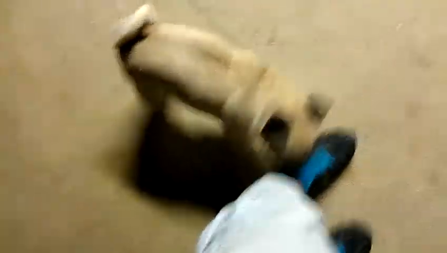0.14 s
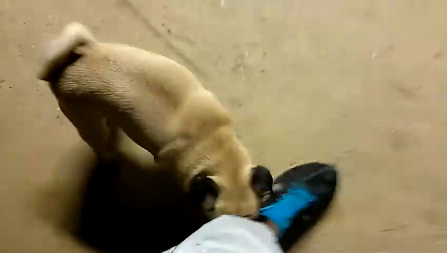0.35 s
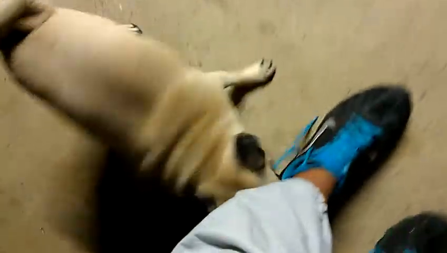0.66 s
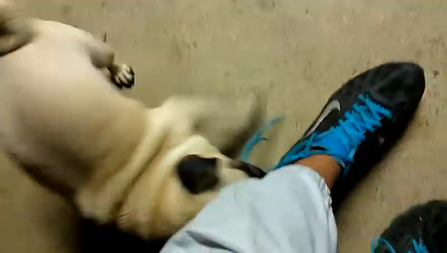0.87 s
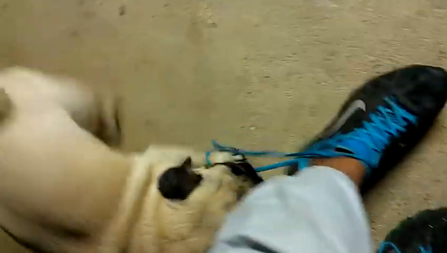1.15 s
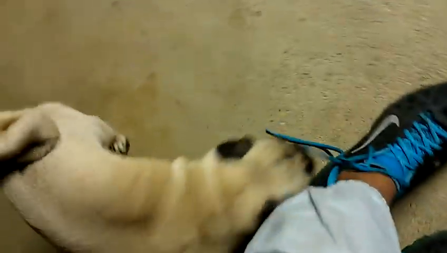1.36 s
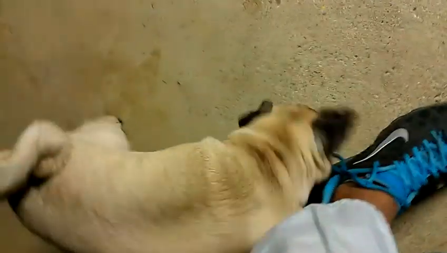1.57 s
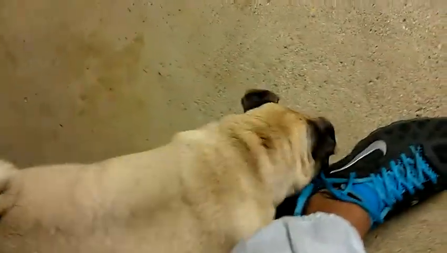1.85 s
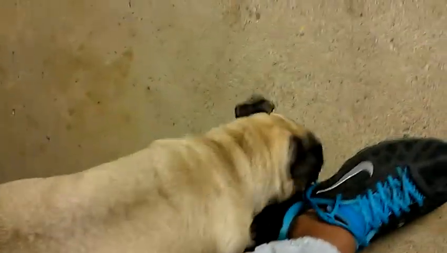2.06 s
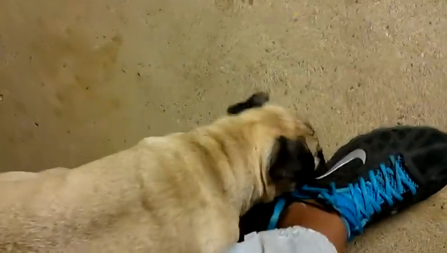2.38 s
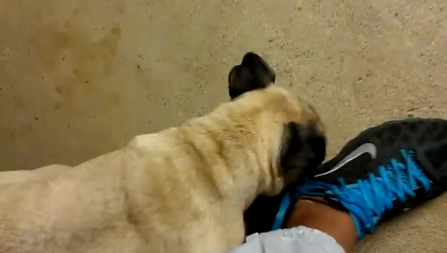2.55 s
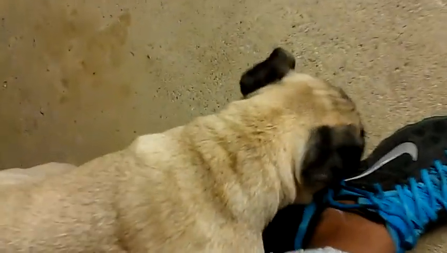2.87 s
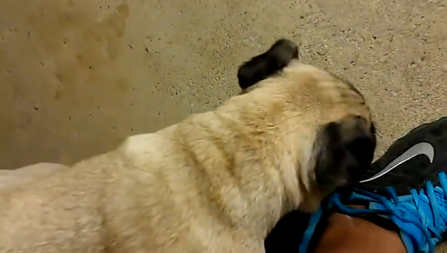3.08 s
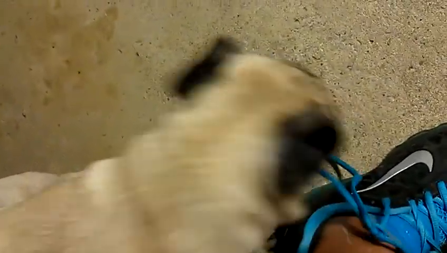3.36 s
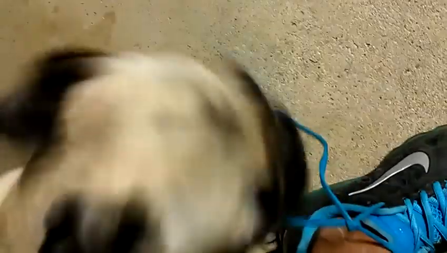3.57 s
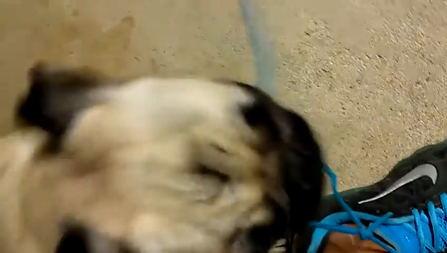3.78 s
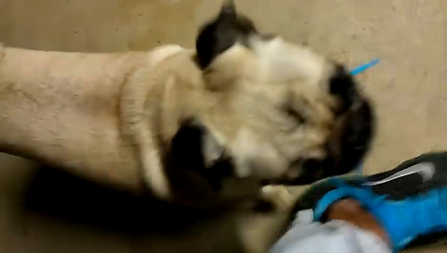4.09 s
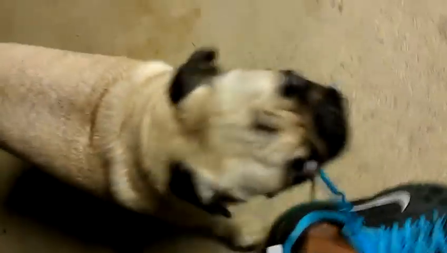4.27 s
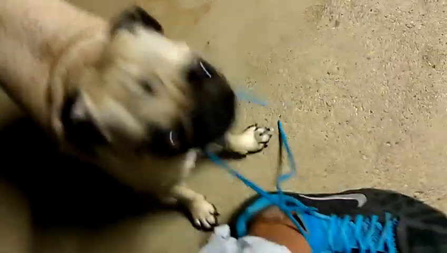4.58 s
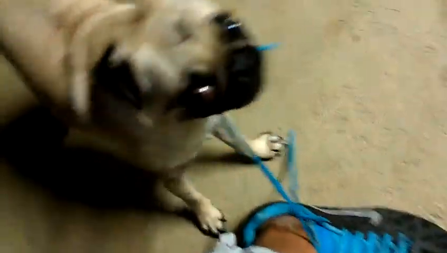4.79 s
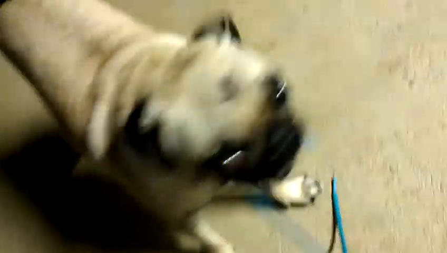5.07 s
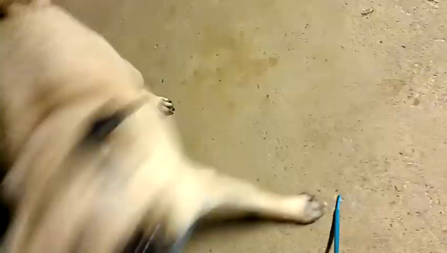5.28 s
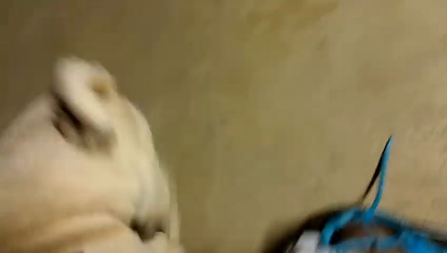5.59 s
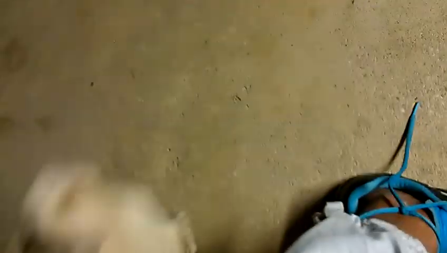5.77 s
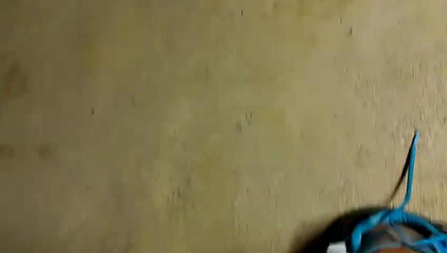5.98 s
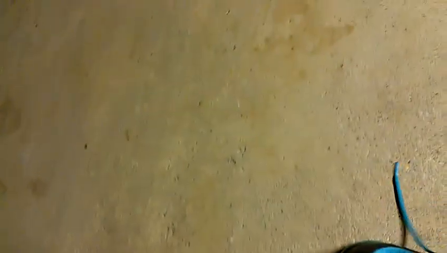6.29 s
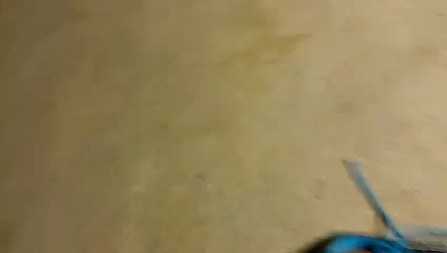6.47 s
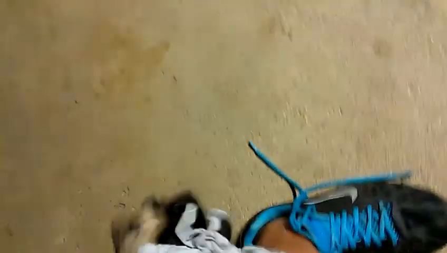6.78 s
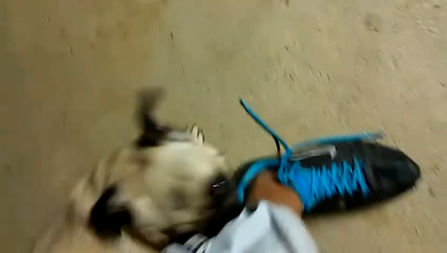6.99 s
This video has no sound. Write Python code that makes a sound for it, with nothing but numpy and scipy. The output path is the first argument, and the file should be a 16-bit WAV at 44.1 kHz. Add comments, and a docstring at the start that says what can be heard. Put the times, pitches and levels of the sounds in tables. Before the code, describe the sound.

A small flat-faced dog snorts and rasps close up, with wet throaty pops and claw clicks on concrete in a hard room.

```python
"""A small flat-faced dog snorts and rasps as it tugs at a shoelace on concrete, close under a phone.
Air noise rushes through throat, mouth, cheek and nostril resonances; the palate flutters and pops as short rings.
Claws and teeth click as bursts of noise. Nearby surfaces and the hard room answer with decaying noise echoes.
Far off lie steady room noise and two wavering machine tones; the phone's stereo microphone colours the dog and room."""
import sys
import numpy as np
from scipy import signal
from scipy.fft import rfft, irfft, next_fast_len
from scipy.io import wavfile
from scipy.ndimage import uniform_filter1d, map_coordinates

SR = 44100
rng = np.random.default_rng(int(sys.argv[2]) if len(sys.argv) > 2 else 0)


def materialize(psi):
    """Save the field psi as 16-bit PCM at rate SR to the path in sys.argv[1].

    A 1-D psi becomes a single channel; in a 2-D psi each row is a channel.
    """
    bounded = np.clip(np.atleast_2d(psi).T, -1, 1)
    quanta = np.round(bounded * 32767).astype(np.int16)
    wavfile.write(sys.argv[1], SR, quanta)


N = 314874
THROAT_HZ = 781


def amp(db):
    """Gain of a level in dB."""
    return 10 ** (np.asarray(db) / 20)


def unit(x):
    """x at rms 1."""
    return x / np.sqrt(np.mean(np.abs(x) ** 2) + 1e-20)


def along(points, hz):
    """(Hz, value) points read on a log frequency axis."""
    f, value = np.transpose(points)
    return np.interp(np.log(hz + 1), np.log(f + 1), value)


def wobble(rate):
    """A smooth random curve with rate knots a second."""
    knots = rng.standard_normal(int(N * rate / SR) + 4)
    return map_coordinates(knots, [np.arange(N) * rate / SR])


def filtered(x, response):
    """x times a response of frequency."""
    m = next_fast_len(N + SR // 2)
    return irfft(rfft(x, m) * response(np.fft.rfftfreq(m, 1 / SR)), m)[..., :N]


def resonance(hz, centre_hz, width_hz, db):
    """A steep peak over frequency, scaled to unit power and then to its level."""
    shape = 1 / (1 + ((hz - centre_hz) / width_hz) ** 2)
    return amp(db) * shape / np.sqrt(np.mean(shape ** 2, axis=0))


# How alike diffuse sound is at the two microphone ports.
# Each row: frequency in Hz, left-right likeness (1 is identical).
PORT_LIKENESS = [(60, 0.48), (180, 1), (520, 0.82), (1540, 0.55), (4560, 0.27), (13500, 0.19)]


def spread(pair):
    """Two unrelated signals mixed into left and right as alike as the ports hear them."""
    def mid_and_side(hz):
        turn = np.arccos(np.clip(along(PORT_LIKENESS, hz), -1, 1)) / 2
        return np.array([np.cos(turn), np.sin(turn)])

    mid, side = filtered(pair, mid_and_side)
    return np.array([mid + side, mid - side])


# Puffs and rasps of air from the dog, close under the microphone.
# Each row: top reached in seconds, rise in seconds, hold in seconds, fall in seconds, throat level in dB,
# mouth level in dB, mouth pitch in Hz, cheek level in dB, cheek pitch in Hz, nostril level in dB,
# damping from 0 to 1 (limited below to 0.06-0.6).
PUFFS = [(0.0, .01, .005, 0.21, -41, -43, 1630, -41, 3980, -43.5, .3),
         (0.26, 0.24, .005, 0.045, -43, -43, 1720, -43, 3970, -42, .3),
         (0.309, .04, 0.017, 0.078, -37, -34, 1910, -37.5, 3510, -36, 0.2),
         (0.392, 0.06, 0.0089, 0.11, -33, -17.5, 1950, -23, 3800, -31.5, 0.27),
         (0.438, .08, 0.071, 0.037, -36.5, -23.5, 1850, -31, 4200, -28.5, 0.19),
         (0.544, 0.023, 0.035, 0.18, -42, -21.5, 1970, -29.5, 4080, -36, 0.05),
         (.62, 0.14, .08, 0.06, -26.5, -35, 1750, -38, 4240, -43, .2),
         (0.757, 0.13, 0.0093, 0.054, -23.5, -22.5, 1440, -30.5, 3850, -35, 0.27),
         (0.812, 0.051, .005, 0.14, -31.5, -31.5, 1720, -31, 4300, -29.5, 0.7),
         (0.996, 0.018, 0.0044, 0.05, -33.5, -32.5, 1460, -51, 3900, -43, 0.32),
         (1.104, 0.094, .005, .1, -47, -55, 1610, -42, 3880, -39, .3),
         (1.156, 0.025, .015, .03, -46, -20, 1890, -37, 3670, -37, 0.22),
         (1.177, 0.032, .005, 0.18, -27, -19, 1910, -20.5, 3600, -28.5, 0.26),
         (1.227, 0.12, 0.054, 0.052, -30.5, -23.5, 1540, -35, 3620, -32, 0.28),
         (1.321, .015, 0.004, .1, -42, -18, 1990, -37, 3240, -56, 0.37),
         (1.434, .015, .02, .02, -43, -37, 1480, -43, 3700, -64, 0.2),
         (1.472, 0.017, 0.014, 0.14, -35, -31.5, 1595, -42, 3820, -77, 0.36),
         (1.63, 0.052, 0.0077, 0.015, -38, -38, 1920, -49, 3920, -74, 0.04),
         (1.903, 0.042, .006, 0.033, -31, -17.5, 2030, -41, 3550, -42, 0.2),
         (1.917, 0.023, .005, 0.2, -26.5, -33, 1780, -39, 3860, -40, 0.4),
         (2.097, 0.24, .06, .1, -48, -46, 1750, -44.5, 3820, -51, .3),
         (2.436, 0.066, 0.11, .1, -42.5, -38, 1960, -36.5, 4500, -39.5, 0.21),
         (2.564, 0.067, 0.063, .05, -50, -26, 2430, -33.5, 3700, -38.5, 0.17),
         (2.618, 0.066, .045, .06, -41, -27.5, 1360, -31.5, 4300, -38.5, 0.25),
         (2.7, 0.069, .04, .1, -34.5, -31, 1970, -31, 3870, -34.5, 0.35),
         (2.792, 0.12, 0.034, 0.062, -31.5, -23, 1750, -26.5, 4320, -33.5, 0.45),
         (2.908, 0.022, .005, 0.38, -37.5, -39.5, 1700, -39, 3840, -40.5, 0.7),
         (3.028, 0.33, .005, .2, -59, -38.5, 1430, -39.5, 3640, -65, 0.3),
         (3.254, 0.25, .03, 0.15, -40, -36.5, 1900, -36.5, 3750, -42.5, 0.86),
         (3.449, 0.013, 0.028, 0.23, -34, -31.5, 1600, -36, 3980, -42.5, 0.45),
         (3.55, 0.071, .005, 0.026, -49, -33, 1900, -29, 4970, -35, 0.23),
         (3.588, 0.047, .005, 0.043, -34, -31, 1780, -33.5, 4170, -51, 0.33),
         (3.633, 0.066, 0.067, 0.21, -35, -28.5, 2130, -26, 4940, -36, 0.25),
         (3.779, 0.13, .1, 0.15, -32, -29, 1580, -32, 4200, -33.5, .45),
         (3.934, 0.23, .005, .1, -37, -33, 1930, -36.5, 4690, -55, 0.21),
         (4.078, 0.055, .005, .05, -41, -38, 1560, -41, 3990, -50, 0.36),
         (4.15, .03, 0.067, .15, -53, -46.5, 1900, -49, 3800, -52, 0.2),
         (4.424, 0.015, .005, 0.097, -27, -28.5, 1430, -33, 3580, -42, 0.6),
         (4.492, 0.019, .005, 0.16, -33, -26, 1800, -31, 3850, -31.5, 0.65),
         (4.606, 0.052, .005, 0.034, -47, -37, 2150, -32, 3950, -23.5, 0.12),
         (4.687, 0.099, .005, 0.013, -38, -28.5, 1820, -34, 3670, -38, 0.33),
         (4.806, 0.091, .005, 0.04, -37, -33.5, 2290, -29, 3900, -21.5, 0.27),
         (4.893, 0.17, .005, 0.097, -39, -37, 1560, -41, 3440, -38.5, .26),
         (4.98, 0.043, 0.0054, 0.069, -34.5, -24.5, 1670, -30.5, 4960, -26.5, 0.3),
         (5.001, 0.056, 0.047, 0.074, -37, -31, 1860, -28.5, 5500, -32.5, .35),
         (5.073, 0.072, 0.022, .12, -29.5, -19, 1940, -27.5, 4020, -28, 0.27),
         (5.15, 0.1, .02, 0.11, -32, -30, 1740, -30.5, 4040, -46, 0.75),
         (5.27, 0.16, .005, 0.42, -41, -38.5, 1566, -41, 3980, -37.5, 0.27),
         (5.433, 0.016, .005, 0.092, -28, -29.5, 1340, -47, 3770, -57, 0.74),
         (5.464, 0.022, .005, .06, -35, -45, 1380, -38, 3970, -32, .55),
         (5.525, 0.071, .005, 0.049, -49, -42, 1880, -37.5, 3880, -29.5, 0.25),
         (5.592, 0.042, .04, 0.16, -46, -44, 1850, -58, 3800, -61, 0.1),
         (5.732, 0.087, .005, 0.14, -43, -37.5, 1490, -45, 3980, -38, 0.3),
         (5.913, 0.0066, .025, 0.026, -54, -29, 1620, -32.5, 3700, -33, 0.2),
         (5.947, 0.0087, .003, 0.037, -31, -8.5, 1275, -21, 3600, -31, 0.12),
         (5.981, 0.081, .01, 0.1, -29, -31.5, 1550, -30.5, 3550, -32.5, 0.55),
         (6.126, 0.093, .005, 0.024, -31.5, -35.5, 1710, -38, 4040, -35.5, 0.6),
         (6.167, 0.021, 0.0064, 0.11, -33, -30.5, 1600, -30, 4440, -31.5, 0.7),
         (6.329, 0.049, 0.017, 0.17, -41, -28.5, 1870, -30, 4760, -39, .45),
         (6.408, 0.27, 0.022, 0.34, -38.5, -32, 1920, -34.5, 4730, -36, 0.27),
         (6.584, 0.02, .005, .06, -31, -11.5, 2140, -40, 3330, -36, .22),
         (6.625, 0.069, 0.083, 0.16, -41, -22.5, 1700, -25, 3700, -33, 0.38),
         (6.747, .02, 0.045, 0.067, -36.5, -28, 2500, -35.5, 3950, -36.5, 0.11),
         (6.896, .02, .005, .07, -42, -35, 1660, -44, 3960, -34, 0),
         (6.932, 0.083, .03, 0.12, -41, -35.5, 1700, -36, 3900, -36.5, .55),
         (7.13, 0.2, .005, .1, -54, -39, 1720, -44, 4000, -41.5, .35)]
SWELL_DB = 20  # a puff gains this much over its rise and loses it over its fall


def breath():
    """Turbulent air, chopped by the fluttering palate, through four cavities; each puff rises, holds, falls."""
    flutter = amp(0.45 * wobble(110) + 1.6 * wobble(330))
    hz, t, air = signal.stft(unit(flutter * rng.standard_normal((2, N))), SR, nperseg=256)
    (top_s, rise, hold, fall, throat_db, mouth_db, mouth_hz,
     cheek_db, cheek_hz, nostril_db, damping) = np.transpose(PUFFS)
    f, damping = hz[:, None], np.clip(damping, 0.06, 0.6)
    throat = resonance(f, THROAT_HZ, 154, throat_db)
    mouth = resonance(f, mouth_hz, 1.2 * damping * mouth_hz, mouth_db)
    cheek = resonance(f, cheek_hz, damping * cheek_hz, cheek_db)
    nostrils = resonance(f, 8570, 2600, nostril_db)
    colours = throat ** 2 + mouth ** 2 + cheek ** 2 + nostrils ** 2

    # distance from the held top, in rises before it or falls after it
    before = (top_s - t[:, None]) / rise
    after = (t[:, None] - top_s - hold) / fall
    away = np.maximum(before, after).clip(0)
    power = colours @ amp(-2 * SWELL_DB * away).T
    power = power / (1 + (520 / (f + 1)) ** 4)  # a small head radiates little bass

    # eddies make small patches of time and frequency louder and quieter
    eddies = uniform_filter1d(rng.standard_normal(power.shape), 2, 0)
    eddies = uniform_filter1d(eddies, 12, 1)
    shaped = air * np.sqrt(power) * amp(0.67 * unit(eddies))
    pair = signal.istft(shaped, SR, nperseg=256)[1][:, :N]
    return spread(pair)


# Colour of the far room noise as it would come through the phone; its overall level is set by DRONE_DB.
# Each row: frequency in Hz, relative level in dB per Hz.
ROOM_NOISE = [(88, -71), (150, -42), (214, -27), (299, -5.5), (565, -11.5), (761, 1), (1110, -8.5),
              (1940, -7), (2760, -11.5), (4010, -12), (9820, -23), (11000, -28), (13000, -109)]
# Far machine tones, before their waver. Each row: frequency in Hz, peak level in dB.
MACHINE_TONES = [(235, -56.5), (465, -56.5)]
DRONE_DB, DRONE_WAVER_DB = -39.5, 1.3


def drone():
    """Far steady noise with two machine tones, unsteady in level and phase."""
    # the phone's colour is taken out here because record() puts it on
    white = rng.standard_normal((2, N))
    noise = unit(filtered(white, lambda hz: amp(along(ROOM_NOISE, hz) - along(PHONE_RESPONSE, hz))))
    t = np.arange(N) / SR
    tones = 0
    for hz, db in MACHINE_TONES:
        level = amp(db + 4.8 * wobble(12))
        tones = tones + level * np.sin(2 * np.pi * hz * t + 0.65 * wobble(18))
    return amp(DRONE_DB + DRONE_WAVER_DB * wobble(12)) * spread(noise) + tones


def echoes(x, decay, size, count):
    """Noise tails whose frequencies die at their own speeds; the paths change count times a second."""
    out, hop = np.zeros((2, N + 2 * SR)), SR // count
    delay = 30  # samples
    for k in range(0, N, hop):
        hz, t, noise = signal.stft(rng.standard_normal((2, size)), SR, nperseg=128)
        fading = noise * amp(-60 * t / along(decay, hz)[:, None])
        tail = signal.istft(fading, SR, nperseg=128)[1]
        tail = tail / np.linalg.norm(tail, axis=1)[:, None]
        wet = signal.fftconvolve(x[None, k:k + hop], tail, axes=1)
        out[:, k + delay:k + delay + wet.shape[1]] += wet
    return out[:, :N]


# Decay off the floor, shoe and legs, close by.
# Each row: frequency in Hz, time to fall 60 dB in seconds.
NEARBY_DECAY = [(300, 0.03), (10000, 0.058)]


def near_echoes(air, hits):
    """Near surfaces comb the sound, otherwise at each port, and shift as the dog moves."""
    source = amp(-9) * hits + amp(-4) * air.mean(axis=0)
    return echoes(source, NEARBY_DECAY, size=2048, count=14)


# Claw and tooth clicks, close to the microphone.
# Each row: start in seconds, body level in dB, body pitch in Hz, edge level in dB, left-right difference in dB.
CLICKS = [(0.085, -30, 3660, -34, 10), (0.548, -21, 4120, -35, -1), (0.576, -10.5, 4300, -35, 2.5),
          (.612, -20, 4470, -29, 9), (0.6355, -22, 4600, -31, 2), (.652, -21, 3700, -40, 2),
          (0.676, -19.5, 3960, -21, 1), (.692, -27, 3800, -40, 2), (.73, -20, 3920, -35, -6),
          (0.7594, -24, 3080, -22, .5), (1.152, -22, 2400, -38, 1), (1.3265, -15.5, 2620, -38, 1),
          (1.4361, -23, 3890, -42, 5), (2.817, -38, 4130, -14.5, -2), (2.912, -45, 6060, -27, -5),
          (2.931, -27, 3480, -29, 5), (2.947, -28, 3090, -21, 1), (2.9906, -30, 3300, -31, 5),
          (3.395, -22.5, 4500, -32, -1), (3.5226, -31, 6000, -24, 5), (4.147, -30, 5240, -23.5, 0),
          (4.206, -28, 2300, -37, 4), (4.402, -41, 4350, -32, 10), (4.425, -27, 2900, -44, 2),
          (4.43, -28, 4300, -44, 4), (4.449, -24, 3200, -44, 4), (4.4951, -20, 3650, -17.5, 6),
          (4.545, -18.5, 2800, -41, 6), (4.6748, -24, 2380, -42, 10), (4.7933, -31, 3920, -12, -4),
          (4.9424, -34, 3250, -24, 2), (5.216, -30, 3590, -21.5, 2), (5.456, -32, 4140, -19.5, -9),
          (5.5067, -43, 3870, -21, -4), (5.5136, -46, 3730, -21, -13), (5.905, -17, 2980, -23, 4),
          (5.9413, -12, 3660, -35, 2), (5.964, -10.5, 3300, -25, 2.5), (5.9864, -10.5, 3700, -37, 8),
          (6.116, -30, 3910, -22, 0), (6.1733, -23, 5870, -25, -2), (6.3338, -21, 3420, -34, 6),
          (6.4178, -25, 3960, -22, -1), (6.895, -43, 3600, -22, 1)]
CLICK_T60_S, CLICK_RISE_S = 0.012, 0.00014
CLICK_WIDTH = 0.11  # of the body pitch


def clicks():
    """A hard tip strikes: a noise burst about its pitch and a bright edge, gone in a few ms."""
    out, t = np.zeros((2, N + SR)), np.arange(2048) / SR
    f = np.fft.rfftfreq(len(t), 1 / SR)
    envelope = amp(-60 * t / CLICK_T60_S) * (1 - np.exp(-t / CLICK_RISE_S))
    for s, body_db, hz, edge_db, pan_db in CLICKS:
        body = resonance(f, hz, CLICK_WIDTH * hz, body_db)
        edge = resonance(f, 8500, 1270, edge_db)
        tip = irfft(rfft(rng.standard_normal((2, len(t)))) * (body + edge))
        tip = tip + 0.38 * tip[::-1]  # each side shares some of the other
        sides = amp([[pan_db / 2], [-pan_db / 2]])
        out[:, round(s * SR):][:, :len(t)] += envelope * sides * tip
    return out[:, :N]


# Decay of the hard room. Each row: frequency in Hz, time to fall 60 dB in seconds.
ROOM_DECAY = [(300, 0.21), (2000, 0.56), (10000, 0.32)]


def room_echoes(hits):
    """The hard room answers pops and clicks with a longer tail."""
    return amp(-14.0) * echoes(hits, ROOM_DECAY, size=14000, count=4)


# Palate pops, close to the microphone. Each row: start in seconds, level in dB, ring pitch in Hz.
POPS = [(0.385, -13, 2380), (.4, -4.5, 1400), (.576, -1, 1930), (.582, -4, 1870), (.596, -10, 816),
        (.613, -9, 1860), (.635, -11, 810), (0.668, -12, 1200), (.677, -9, 880), (.717, 5.5, 790),
        (0.728, -11, 1700), (.742, -2, 1350), (.76, 4, 870), (.804, -9, 766), (.81, -15.5, 1900),
        (.823, -4.5, 890), (1.152, 0.5, 1890), (1.18, -3, 1570), (1.326, -2.5, 2330), (1.471, -16, 1450),
        (1.528, -17, 774), (1.624, -24, 2050), (1.877, -8, 1870), (1.892, 1, 1850), (1.899, -1, 1690),
        (1.905, 7.5, 760), (2.796, -12, 1360), (3.29, -18.5, 763), (3.451, -1.5, 740), (3.674, -13.5, 1280),
        (3.786, -9, 1280), (3.819, -6, 1290), (3.838, -1.5, 1220), (3.861, -4, 1290), (3.881, -10, 1250),
        (3.898, -12, 1320), (4.362, -19, 730), (4.382, -8.5, 730), (4.415, 3.5, 740), (4.424, -8, 1380),
        (4.449, -1, 730), (4.482, 3, 744), (4.52, -3.5, 740), (4.544, -12, 1480), (4.633, -12.5, 2180),
        (4.659, -20, 2090), (4.675, -15, 2140), (4.69, -10, 753), (4.975, -23, 1770), (5.071, -4, 1780),
        (5.173, -16, 1650), (5.236, -21, 1530), (5.402, -19, 2000), (5.422, 1, 1030), (5.429, -0.5, 783),
        (5.906, -4, 1370), (5.941, -6, 1120), (5.946, -12, 1400), (5.951, 6.5, 1180), (5.957, -13, 1230),
        (5.966, 0.5, 1530), (5.987, -2.5, 1700), (6.012, -24, 804), (6.086, -21, 1400), (6.149, -21, 1110),
        (6.177, -12.5, 1460), (6.333, -18, 2340), (6.483, -16, 1680), (6.551, -11, 2310), (6.567, -8, 2000),
        (6.581, -1.5, 1810), (6.588, -3, 2530), (6.623, 0.5, 1740)]
POP_T60_S, POP_SHORTENS = 0.014, 0.29  # ring time at 0 dB and 1200 Hz; dB of ring time lost per dB of level
POP_PITCH_POWER = 0.27  # higher cavities ring shorter
KNOCK_DB, KNOCK_DB_PER_OCTAVE = -9.5, -16  # knock under a pop at the throat pitch; weaker under higher pops
SWELL_CYCLES = 1.1  # a pop needs about a cycle to build up


def pops():
    """The palate snaps open: a cavity rings a few cycles, its pitch sagging; the throat knocks under it."""
    out, t = np.zeros(N + SR), np.arange(SR // 10) / SR
    sag = t + 0.00055 * (1 - np.exp(-t / 0.00038))  # time runs fast at first, so pitch starts high
    phase = 2 * np.pi * sag
    for s, db, hz in POPS:
        t60 = POP_T60_S * amp(-POP_SHORTENS * db) * (1200 / hz) ** POP_PITCH_POWER
        knock_db = KNOCK_DB + KNOCK_DB_PER_OCTAVE * np.log2(hz / THROAT_HZ)
        swell = (1 - np.exp(-t * hz / SWELL_CYCLES)) ** 2
        overtone = amp(-16.0 - 60 * t / 0.01) * np.sin(1.66 * hz * phase)
        ring = np.sin(hz * phase) + overtone
        knock = amp(knock_db) * np.sin(THROAT_HZ * 0.832 * phase)
        crackle = uniform_filter1d(rng.standard_normal(len(t)), size=15) * amp(-13 - 60 * t / 0.028)
        pop = amp(db - 60 * t / t60) * (swell * (ring + knock) + crackle)
        out[round(s * SR):][:len(t)] += pop
    return out[:N]


# Where the dog's head is under the microphone; only the movement about the mean is used.
# Each row: time in seconds, left-right difference in dB.
HEAD_PATH = [(0.0, 6), (.7, 7.5), (1.4, 6), (2.1, 8), (2.5, 6), (3.2, 5), (4.0, 7), (5.0, 7.5), (5.6, 6.5),
             (6.4, 7), (7.14, 6)]


def head_sides():
    """Left and right gains as the head moves across the microphone."""
    s, pan_db = np.transpose(HEAD_PATH)
    side_db = np.interp(np.arange(N) / SR, s, pan_db - np.mean(pan_db)) / 2
    return amp([side_db, -side_db])


# Unequal microphone ports. Each row: frequency in Hz, left-right difference in dB.
PORT_LEAN = [(60, 9), (180, 6.5), (520, 3.5), (1540, 6.5), (4560, 2), (13500, 3.5)]


def through_ports(heard):
    """The two ports hear each frequency at different strengths."""
    return filtered(heard, lambda hz: amp([along(PORT_LEAN, hz) / 2, -along(PORT_LEAN, hz) / 2]))


def scene():
    """The dog close by, its echoes and the room noise."""
    air, snaps, taps = breath(), pops(), clicks()
    hits = snaps + taps.mean(axis=0)
    dog = amp(-1.5) * air + snaps + near_echoes(air, hits)
    heard = dog * head_sides() + room_echoes(hits) + drone()
    return taps + through_ports(heard)  # the clicks carry their own left-right balance


# Colour of the phone's microphone. Each row: frequency in Hz, gain in dB.
PHONE_RESPONSE = [(60, -23), (150, -24), (200, -12), (300, -1.5), (9500, 0), (11500, -6), (12500, -32),
                  (13500, -59)]
TOP_HZ = 14000


def record(dry):
    """The phone rounds off the loudest peaks and cuts bass and top treble."""
    x = dry / (1 + np.abs(dry) ** 8) ** (1 / 8)
    x = filtered(x, lambda hz: amp(along(PHONE_RESPONSE, hz)))
    return filtered(x, lambda hz: hz < TOP_HZ)


dry = scene()
out = record(dry)
materialize(out)
```